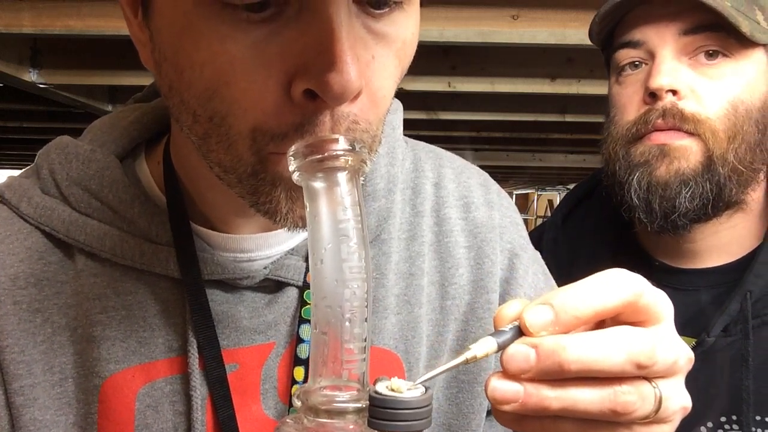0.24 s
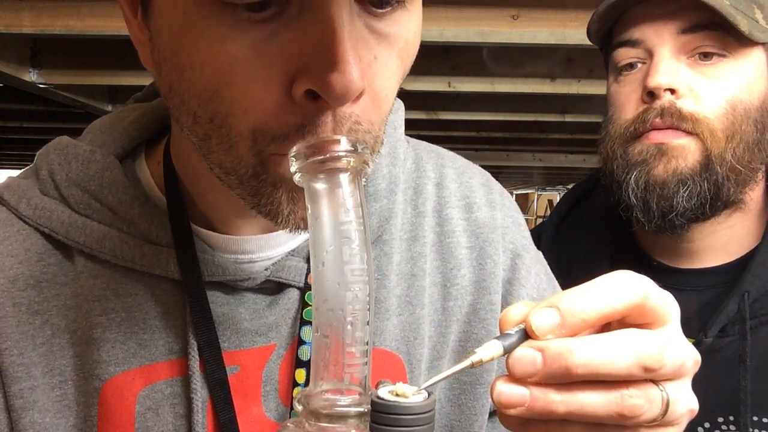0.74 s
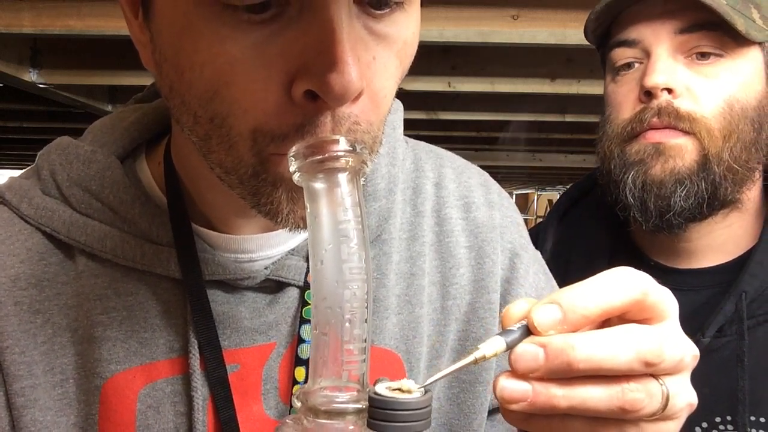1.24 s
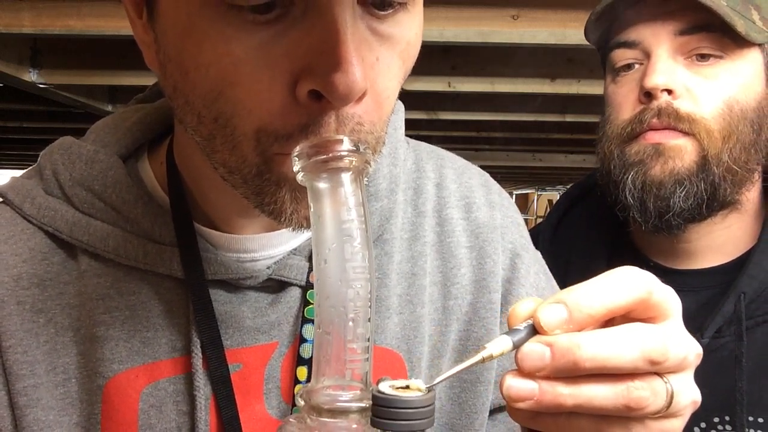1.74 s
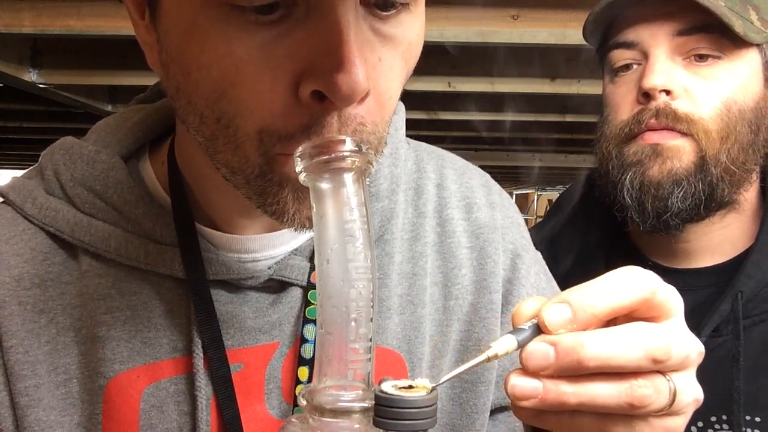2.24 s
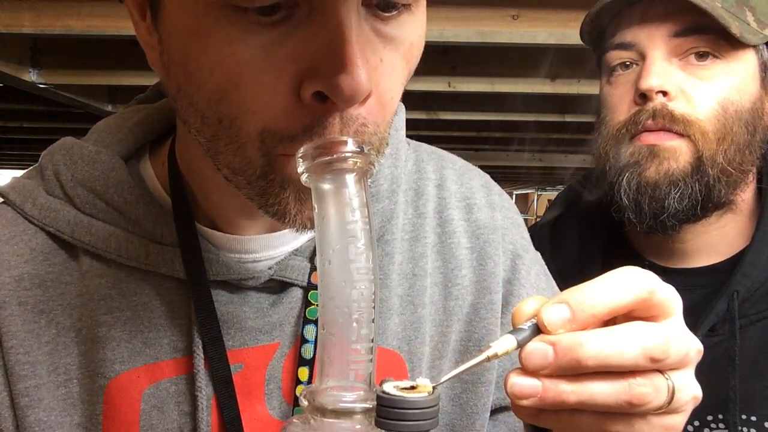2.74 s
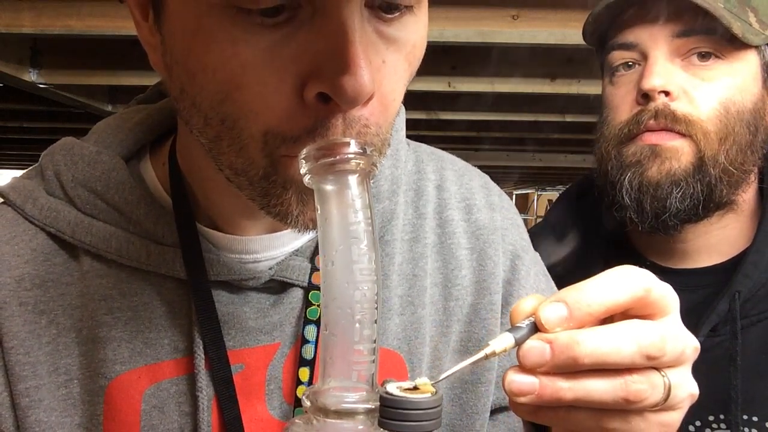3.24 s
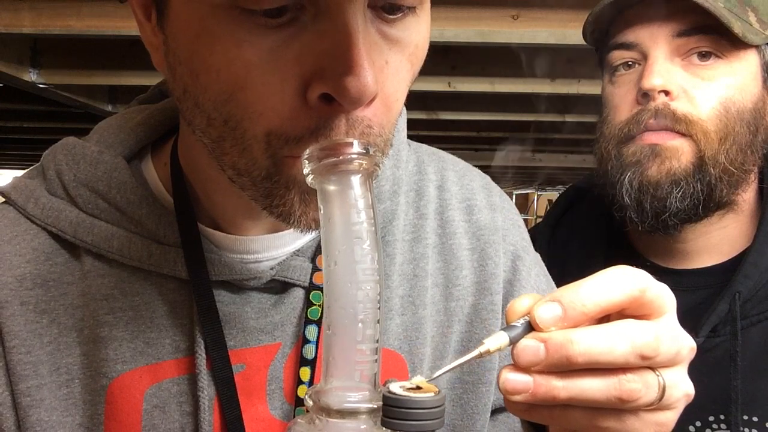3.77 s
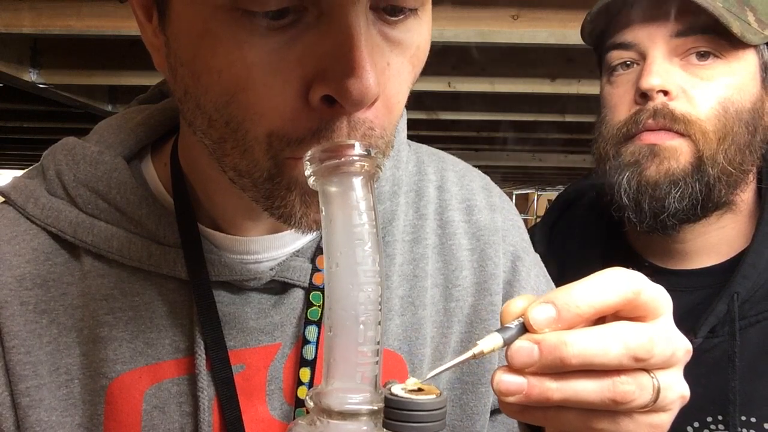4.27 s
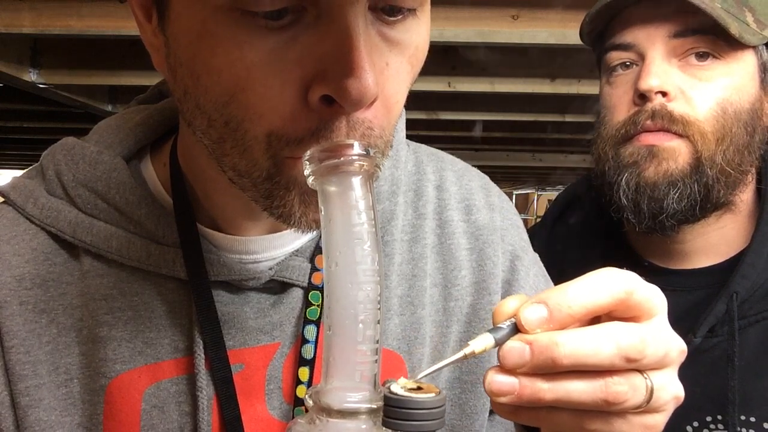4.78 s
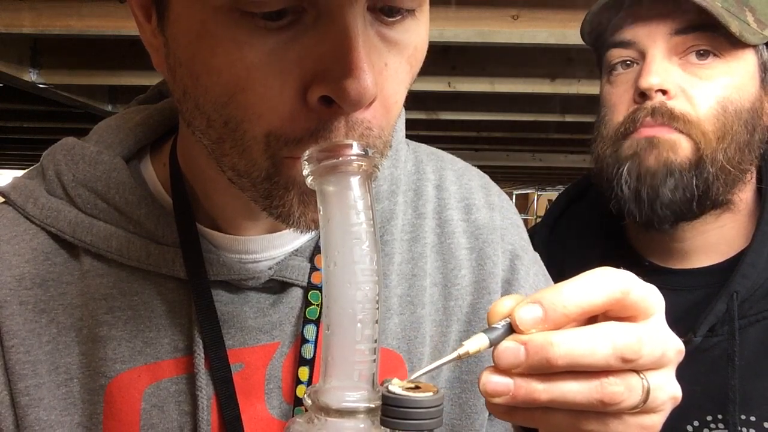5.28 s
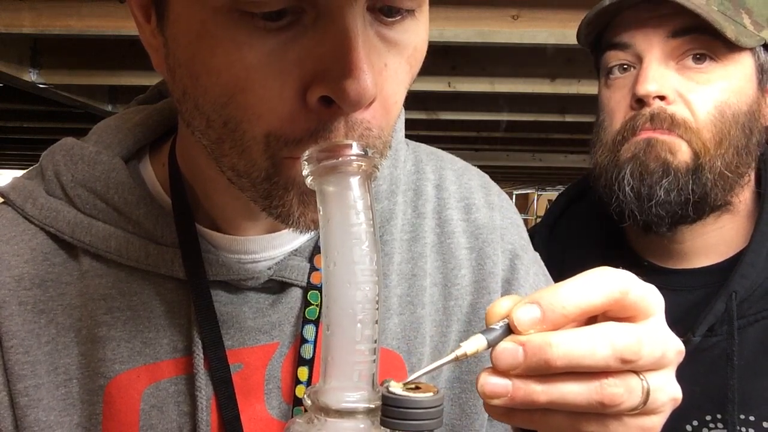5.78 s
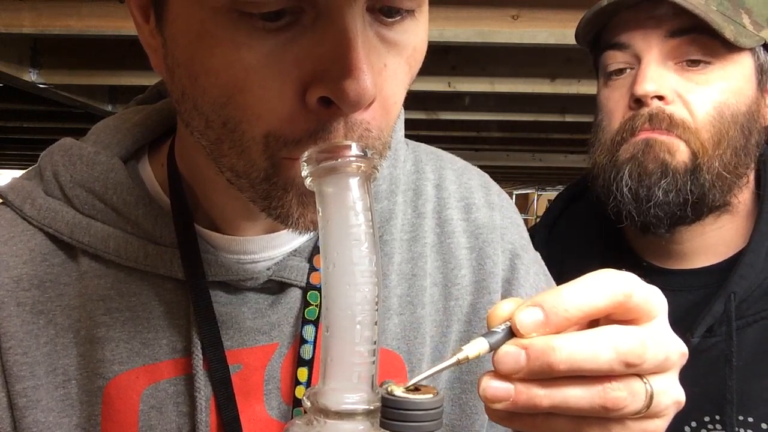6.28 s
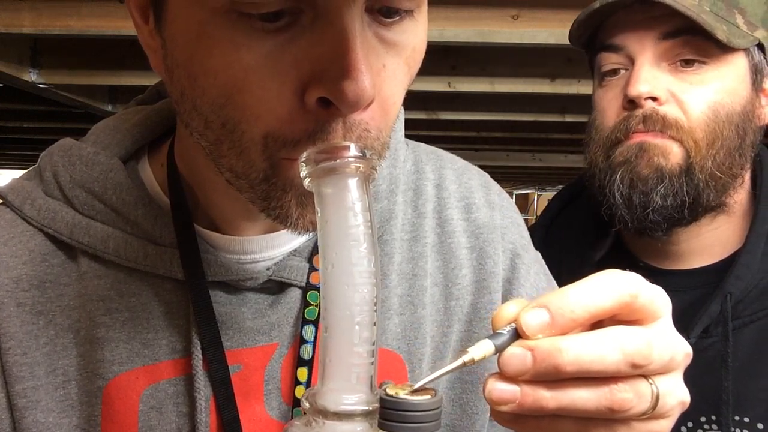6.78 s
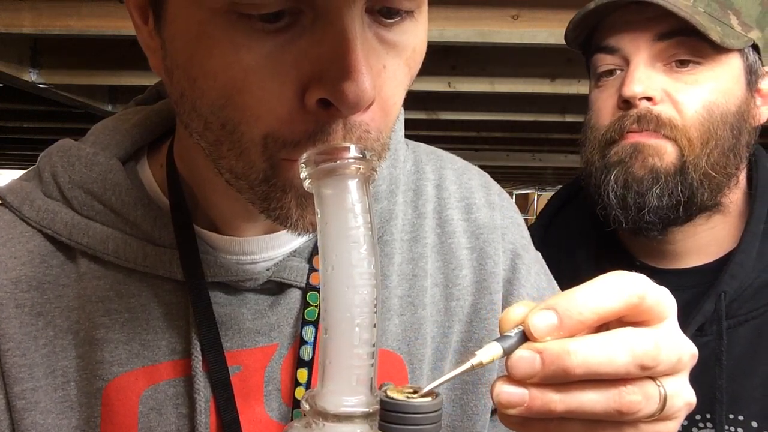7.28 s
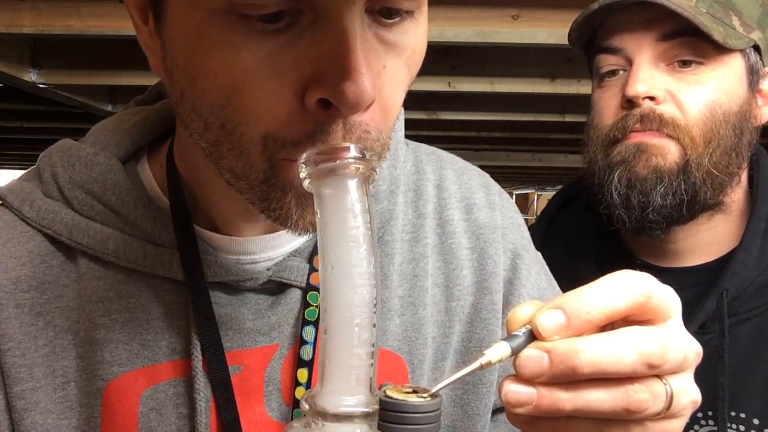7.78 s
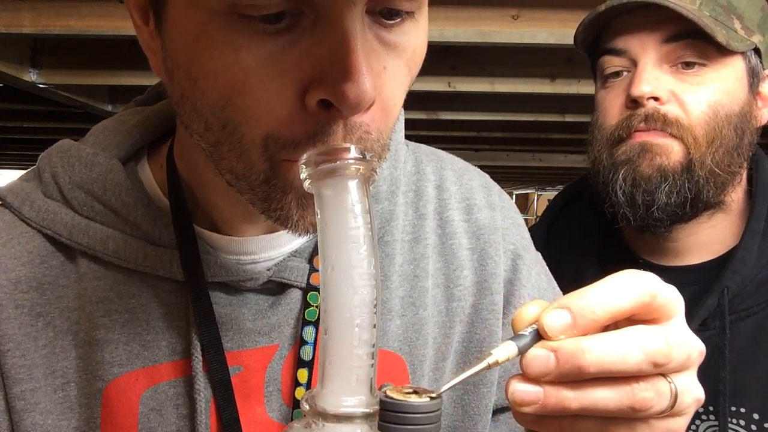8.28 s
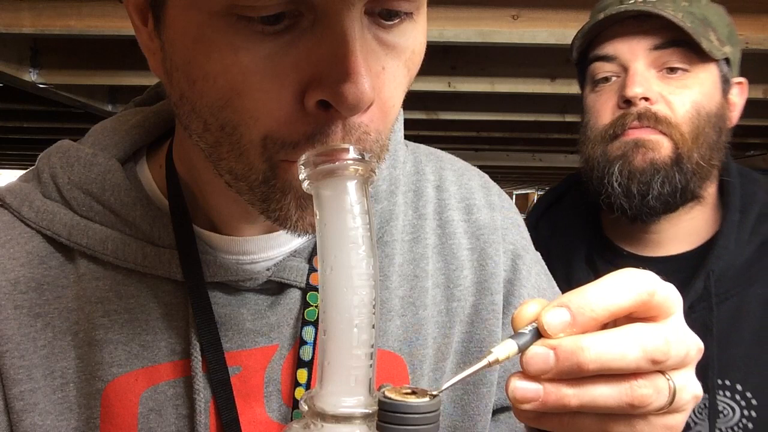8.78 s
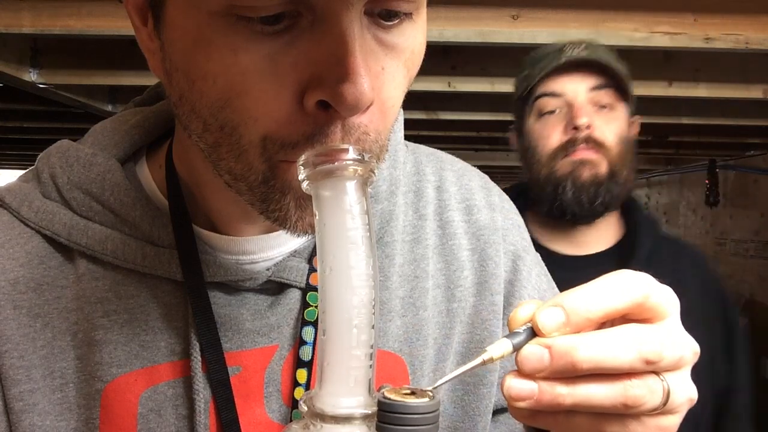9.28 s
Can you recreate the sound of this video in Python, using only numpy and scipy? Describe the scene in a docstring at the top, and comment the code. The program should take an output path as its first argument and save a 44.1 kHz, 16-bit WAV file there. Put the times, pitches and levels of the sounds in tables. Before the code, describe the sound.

From 0 to about 9.5 seconds, a glass water pipe bubbles without a break, close to the microphone in a dry indoor workshop. Many bubbles burst each second in uneven clusters: hollow low glugs, rounder middle-pitched plops and small high blips, each very short and slightly rising, over soft froth. A stronger burble stands out near 1.7 seconds, another near 7.1 and a hollow glug around 7.8. Tiny splashes and glassy ticks scatter throughout, with sharper pings near 3.9, 4.3 and especially 5.7. Hot oil sizzles faintly, strongest around 2.4, with thin crackly spits that grow rarer. A steady low motor hum, rumble and slight hiss continue beneath. From about 8.8 to 9.3 a jacket rustles, brightest near 9.1, with small cloth snaps and a deep soft swell; another brief rub follows at 9.46 as bubbling continues.

```python
"""Bubbling glass water pipe

Air drawn steadily through a water pipe in a workshop: bubbles burst as rising sines and ring the air
chambers (resonators), splashes ring higher, drops tick on the glass (decaying modes). Hot oil in the
bowl sizzles as shaped noise with spits. Near the end a jacket rustles, in noise bands, as someone turns.
Motors and mains hum as sines over a low noise rumble.
"""
import sys
import numpy as np
from scipy import signal
from scipy.fft import rfft, irfft
from scipy.io import wavfile
from scipy.ndimage import uniform_filter1d

SR = 44100
rng = np.random.default_rng(int(sys.argv[2]) if len(sys.argv) > 2 else 0)


def materialize(psi):
    """Save the field psi as 16-bit PCM at rate SR to the path in sys.argv[1].

    A 1-D psi becomes a single channel; in a 2-D psi each row is a channel.
    """
    bounded = np.clip(np.atleast_2d(psi).T, -1, 1)
    quanta = np.round(bounded * 32767).astype(np.int16)
    wavfile.write(sys.argv[1], SR, quanta)


N = 419832

# Loudest bubbles. Each row: time in seconds, nominal peak in dB, pitch in Hz, length scale in ms.
BUBBLES = [(0.013, -49, 800, 5.3), (0.03, -47.5, 700, 4.8), (0.058, -43, 780, 7.5), (0.089, -41, 311, 7.9),
           (0.136, -46.5, 774, 5.3), (0.147, -50.5, 720, 6.4), (0.232, -63, 1390, 3.64),
           (0.253, -45, 330, 2.8), (0.255, -48.5, 1455, 4.8), (0.258, -46, 816, 5.5),
           (0.274, -56, 2873, 4.5), (0.357, -44.5, 671, 11), (0.357, -51, 1290, 3.6), (0.367, -59, 1920, 7),
           (0.428, -47, 832, 3.8), (0.434, -45, 1490, 8.6), (0.446, -40, 750, 3.9), (0.522, -41, 755, 2.3),
           (0.482, -63, 2870, 4), (0.54, -52.5, 1910, 7.8), (0.564, -55, 1930, 7.7), (0.582, -44, 542, 7.5),
           (0.655, -42, 740, 3.5), (0.694, -46.5, 288, 10.8), (0.695, -41, 836, 4.6),
           (0.656, -63, 2920, 10), (0.693, -47, 1420, 5.7), (0.699, -50, 1940, 5.3),
           (0.717, -45.5, 318, 3.9), (0.742, -44, 686, 2.6), (0.752, -44.5, 310, 7),
           (0.816, -53.5, 1440, 5.8), (0.84, -50, 291, 11.4), (0.886, -58, 1905, 8),
           (0.921, -55, 1940, 9.6), (0.966, -53.5, 810, 5.5), (0.989, -48, 1410, 3.6),
           (1.014, -40.5, 740, 5.7), (1.029, -47.5, 1460, 10.5), (1.029, -57, 2835, 4.6),
           (1.063, -53.5, 2920, 7.3), (1.1, -46, 750, 11.6), (1.2, -60, 2870, 5.3),
           (1.202, -40.5, 790, 1.7), (1.184, -51.5, 1450, 7.1), (1.203, -52.5, 1940, 5.2),
           (1.263, -51.5, 1510, 5.6), (1.264, -47.5, 796, 3.8), (1.273, -49, 293, 11),
           (1.324, -52, 752, 5.3), (1.383, -48, 840, 4.4), (1.427, -42.5, 350, 5.9), (1.44, -41, 770, 2.3),
           (1.457, -57, 1980, 4), (1.556, -46.5, 870, 4.9), (1.591, -49.5, 1440, 5.6),
           (1.62, -67, 2960, 4.9), (1.675, -50, 1494, 5), (1.727, -50, 1535, 7.7), (1.589, -48, 375, 16),
           (1.655, -32.5, 787, 3.8), (1.701, -42, 857, 5.9), (1.733, -35, 653, 1.3), (1.8, -47, 645, 4.4),
           (1.801, -48.5, 1920, 6.6), (1.824, -48.5, 1860, 4.8), (1.844, -50, 1900, 8),
           (1.828, -43, 313, 8.5), (1.829, -40.5, 800, 3.4), (1.86, -37, 308, 3.1), (1.881, -44, 284, 16),
           (1.888, -48, 840, 5.4), (1.968, -51, 279, 10), (2.068, -42.5, 875, 4.7), (2.264, -46, 855, 5.5),
           (2.184, -60.5, 2800, 5), (2.254, -54.5, 1900, 4.3), (2.333, -48.5, 285, 11),
           (2.395, -45, 850, 4.2), (2.406, -57, 1920, 6.2), (2.391, -46, 302.4, 16.4),
           (2.44, -39, 350, 5.3), (2.441, -40, 760, 2.6), (2.495, -36.5, 740, 4.7), (2.503, -56, 1940, 4.7),
           (2.508, -58.5, 2870, 4.4), (2.52, -49.5, 1470, 5), (2.529, -52, 2750, 1.6),
           (2.531, -41, 760, 4.6), (2.635, -46, 748, 3), (2.642, -42.5, 287, 22), (2.684, -47.5, 306, 8.1),
           (2.686, -50, 1520, 7.5), (2.722, -53, 1940, 5.4), (2.726, -54, 1470, 5.4),
           (2.786, -56, 2500, 4.1), (2.745, -46, 280, 20), (2.745, -40.5, 737, 2.4),
           (2.913, -45.5, 650, 3.3), (3.0, -44.5, 1500, 3.1), (2.997, -50, 275, 7.2),
           (3.204, -53, 1930, 6.8), (3.225, -46.5, 350, 7.7), (3.232, -42.5, 767, 4),
           (3.368, -50.5, 317, 7.6), (3.379, -55, 1510, 6.1), (3.477, -60, 2900, 5.9),
           (3.52, -48.5, 1920, 9.6), (3.559, -49.5, 380, 8.4), (3.605, -44, 687, 2),
           (3.703, -42.5, 791, 3.2), (3.706, -41.5, 336, 6.5), (3.726, -45, 285.5, 14.6),
           (3.725, -43.5, 1470, 4.3), (3.726, -44, 730, 2.3), (3.727, -47, 1930, 5.3),
           (3.726, -58, 2960, 5.8), (3.835, -48, 1530, 4.5), (3.861, -41.5, 764, 2.57),
           (3.993, -53.5, 1870, 7.7), (4.013, -47.5, 1450, 7.3), (4.027, -46, 1380, 4.3),
           (4.033, -42, 760, 2.8), (4.073, -44, 269, 10.4), (4.116, -43.5, 830, 7.9),
           (4.22, -49.5, 1448, 5.7), (4.221, -51, 1940, 7), (4.238, -46, 273, 11.4), (4.238, -44, 768, 5.3),
           (4.282, -61, 2780, 5.7), (4.293, -49, 296, 4.4), (4.366, -48.5, 314, 12),
           (4.471, -56.5, 2800, 5), (4.505, -49, 1440, 3.4), (4.524, -48.5, 320, 19),
           (4.525, -40.5, 650, 2.5), (4.554, -46.5, 553, 6.2), (4.571, -42, 780, 6),
           (4.594, -62, 2920, 7.1), (4.711, -48.5, 1440, 5.9), (4.714, -43, 776, 3.9),
           (4.738, -49, 800, 2.6), (4.799, -44, 652, 4.2), (4.81, -61, 1935, 6.1), (4.978, -59, 1930, 6.6),
           (4.948, -52, 290, 9.7), (4.96, -65, 2900, 5.7), (4.995, -68, 2960, 5.5), (4.989, -48, 818, 7.6),
           (5.173, -41.5, 684, 2.2), (5.217, -41, 630, 3.2), (5.217, -49, 1530, 4.7), (5.184, -48, 287, 11),
           (5.291, -47.5, 1425, 5), (5.312, -45.5, 291, 18), (5.316, -41.5, 1450, 1.7),
           (5.317, -51, 1730, 12), (5.336, -56, 1940, 6.7), (5.367, -49.5, 846, 8.2),
           (5.397, -56.5, 2870, 4), (5.407, -52, 921, 5.2), (5.446, -51, 1900, 5.8),
           (5.53, -60.5, 2900, 6.3), (5.65, -42, 830, 4), (5.77, -48, 781, 4.6), (5.82, -52, 1526, 6.1),
           (5.887, -46, 800, 4.6), (5.839, -46.5, 1500, 5.2), (5.904, -47, 830, 7.5),
           (6.001, -54, 1940, 5.6), (6.017, -51.5, 355, 7.2), (6.128, -48, 875, 3.7),
           (6.142, -40, 930, 3.9), (6.164, -48, 290, 7.6), (6.221, -51, 805, 3.3), (6.315, -49, 277, 8.7),
           (6.355, -38.5, 290, 4.9), (6.487, -50, 678, 3.6), (6.506, -50, 1930, 7.3), (6.588, -47, 300, 14),
           (6.668, -38.5, 850, 3.9), (6.668, -46, 1480, 9.2), (6.699, -45, 296, 7), (6.702, -40, 714, 3.2),
           (6.752, -65.5, 2930, 7.5), (6.83, -48.5, 1470, 7.3), (6.819, -50, 825, 4.8),
           (6.892, -52.5, 1510, 5.2), (6.891, -55, 825, 2.9), (7.047, -49.5, 840, 3),
           (7.07, -39, 1580, 4.5), (7.07, -35.5, 760, 4), (7.072, -38, 1850, 3.5), (7.092, -46, 284, 4.6),
           (7.175, -53, 850, 3.4), (7.204, -49.5, 845, 7), (7.302, -46, 680, 2.5),
           (7.312, -45.5, 300, 18.3), (7.488, -49.5, 656, 5.5), (7.648, -46, 332, 5.5),
           (7.675, -54, 1940, 7.2), (7.784, -49.5, 1550, 7.1), (7.855, -51, 1820, 6.9),
           (7.83, -49.5, 1320, 4.8), (7.835, -36, 303, 9.9), (7.879, -42, 334, 3.9), (7.881, -44, 784, 14),
           (7.954, -47.5, 790, 4.2), (7.98, -60, 2830, 5.6), (8.03, -52.5, 830, 6.1), (8.084, -50, 845, 6),
           (8.16, -41.5, 586, 4.3), (8.175, -42.5, 350, 8.1), (8.244, -43, 300, 7.2),
           (8.239, -49, 824, 3.2), (8.348, -47.5, 1540, 3.6), (8.392, -54.5, 1940, 7.3),
           (8.453, -59, 2840, 4.7), (8.487, -48.5, 656, 5.8), (8.447, -47.5, 1505, 10.3),
           (8.461, -48, 830, 4.2), (8.501, -46, 280, 15.4), (8.575, -45.5, 1450, 2.4),
           (8.584, -44.5, 593, 2.4), (8.649, -44.5, 600, 4.2), (8.6495, -43, 1660, 1.7),
           (8.651, -41, 1916, 7.7), (8.65, -41, 1530, 7.6), (8.673, -47, 1510, 5.4),
           (8.666, -45, 289, 17.2), (8.927, -48.5, 1490, 2.5), (8.943, -46.5, 855, 6.4),
           (8.952, -44, 312, 7.8), (9.004, -48, 281, 20), (9.18, -54, 1860, 5.6), (9.223, -51, 1520, 4.6),
           (9.308, -40.5, 796, 4.3), (9.348, -41, 670, 3.3), (9.483, -40.5, 800, 4.1),
           (9.494, -45, 1400, 2.7), (9.511, -44, 330, 4.8)]
# Sizes of lesser bubbles dragged along by the loud ones.
# Each row: mean pitch in Hz, mean peak in dB, median length in ms, relative share.
FOLLOWERS = [(285, -52, 14, .22), (350, -56.5, 6, .06), (571, -53, 6, .15), (830, -54.5, 6, .2),
             (932, -53, 5, .14), (1470, -57, 5, .13), (1900, -61.5, 8.02, .1)]
# Air chambers of the pipe. Each row: resonance in Hz, width in Hz, mean level in dB.
CHAMBERS = [(283, 23.8, -2), (361.5, 75, -6.5), (549, 59, -8.5), (832, 120, -3.5), (1285, 68, -6.5),
            (1486, 112, -2), (1940, 44, 1)]
# Loudest splashes at the surface.
# Each row: start in seconds, ring strength in dB, centre in Hz, spatter re ring in dB.
SPLASHES = [(0.0333, -59, 2520, -8), (0.2744, -50, 2930, -4), (0.4818, -61, 2900, -6),
            (0.5252, -63, 3290, -7), (0.5821, -60, 2740, -6), (0.6554, -63, 2960, -9),
            (0.8644, -61, 2690, -6), (1.0296, -53, 2850, -8), (1.063, -48, 2920, -10),
            (1.1498, -57, 2920, -6), (1.197, -56, 2950, -6), (1.3688, -65, 2550, -6),
            (1.4556, -61, 2630, -6), (1.5499, -62, 3700, -9), (1.6192, -59, 2960, -8),
            (1.9345, -63, 2900, -6), (2.0817, -60, 2880, -8), (2.183, -54, 2790, -6),
            (2.356, -65, 3070, -6), (2.395, -59, 2900, -6), (2.5077, -58, 2880, -6), (2.528, -54, 2780, -6),
            (2.603, -57, 2930, -9), (2.7854, -58, 2480, -6), (2.814, -59, 2960, -7),
            (3.2036, -61, 2875, -6), (3.3558, -62, 2920, -6), (3.4765, -59, 2920, -6),
            (3.5553, -61, 2830, -6), (3.7249, -55, 2920, -5), (3.8711, -54, 3460, -6),
            (3.9165, -63, 2630, -6), (4.0826, -62, 2890, -7), (4.2373, -62, 2950, -8),
            (4.2822, -59, 2760, -6), (4.4687, -53, 2850, -7), (4.5351, -58, 2600, -6),
            (4.595, -56, 2910, -9), (4.7506, -60, 2950, -9), (4.8174, -59, 2950, -10),
            (4.8459, -56, 2880, -9), (4.9601, -58, 2950, -7), (4.9955, -56, 2930, -8),
            (5.0464, -63, 3220, -6), (5.1891, -64, 2630, -6), (5.227, -62, 2550, -6),
            (5.2909, -52.5, 2790, -16), (5.3353, -61, 2910, -6), (5.3966, -56, 2920, -7),
            (5.5293, -59, 2950, -12), (5.7024, -54.5, 3540, 0), (5.7745, -58, 2820, -6),
            (5.8865, -70, 2930, -6), (6.4931, -64, 2790, -8), (6.5615, -65, 2900, -8),
            (6.7526, -61, 2890, -9), (6.7905, -62, 2920, -6), (6.8309, -61, 2730, -8),
            (7.0459, -55, 2740, -8), (7.0693, -57, 2800, -6), (7.1107, -62, 2920, -7),
            (7.5926, -62, 2800, -8), (7.7398, -60, 2890, -8), (7.9808, -58, 2846, -6),
            (8.4532, -57, 2900, -7), (8.5195, -56.5, 2770, -9), (8.6163, -65, 2890, -6),
            (8.6687, -66, 2630, -6), (8.708, -55.5, 2720, -7), (8.7974, -63, 3660, -6)]
# Loudest drops on the glass.
# Each row: time in seconds, strength in dB, strongest mode in Hz, crack re strength in dB.
DROPS = [(0.0742, -64, 4700, -12.5), (0.0917, -60, 4670, -20), (0.2533, -62, 4780, -16),
         (0.273, -60.5, 4800, -10), (0.557, -69, 5980, -15), (0.5876, -63, 4650, -22),
         (0.7744, -59, 4610, -20), (0.814, -62, 5900, -21), (1.1507, -56.5, 3600, -19),
         (1.197, -61, 4650, -17), (1.25, -64, 5800, -23.5), (1.4097, -62, 4560, -16),
         (1.5475, -61, 3710, -15), (1.569, -59, 4940, -13), (1.85, -68, 4700, -18),
         (2.1086, -61, 4770, -21.5), (2.169, -53, 3900, -23), (2.1844, -61, 4700, -7),
         (2.288, -65, 5980, -23.5), (2.563, -57, 4760, -16), (2.7362, -65, 4770, -25),
         (2.7564, -55, 4680, -24), (2.822, -63, 4640, -20), (2.9744, -63, 4740, -23.5),
         (3.21, -63, 4680, -26), (3.23, -68, 5980, -8), (3.264, -56.5, 7070, -13), (3.2632, -64, 7780, -20),
         (3.338, -73, 4680, -22), (3.703, -49.5, 4685, -26), (3.7918, -62, 4695, -24),
         (3.8716, -48, 3500, -25), (3.91, -62, 4650, -18), (4.0635, -64, 4700, -21),
         (4.283, -59, 7070, -30), (4.3376, -51.5, 7780, -9.5), (4.338, -54, 7070, -24),
         (4.5368, -55.5, 4940, -17), (4.9902, -61, 4680, -19), (5.1313, -63, 4700, -22),
         (5.257, -62, 4640, -22), (5.384, -63, 4890, -7), (5.4355, -65.5, 4640, -20.5),
         (5.7031, -41.5, 7400, -12), (6.0205, -59, 4720, -17), (6.039, -64, 4700, -22.5),
         (6.5796, -65, 4650, -22), (6.6686, -57.5, 4700, -27), (6.7461, -59, 4840, -15),
         (6.794, -63, 4730, -15), (7.222, -70, 7070, -20), (7.7957, -68, 4630, -22),
         (7.9613, -64.5, 4670, -14), (8.043, -69, 5980, -6), (9.372, -57, 4610, -14)]
# Glass modes. Each row: pitch in Hz, relative level in dB, t60 in seconds.
GLASS_MODES = [(2790, 4, 0.025), (2870, 7.5, 0.062), (3600, 1.5, 0.03), (4610, -2, 0.025), (4685, 5, 0.041),
               (4770, 0.5, 0.024), (5000, -8, 0.011), (5980, 1, 0.034), (7070, -2.5, 0.044),
               (7780, -12, 0.03), (8900, -11, 0.02), (9800, -11, 0.034), (12300, -3, 0.035)]
# Hot oil in the bowl. Each row: time in seconds, mean sizzle level in dB.
HEAT = [(0, -87), (1.6, -84), (2.4, -80.5), (3.3, -83.5), (4.4, -83.5), (5.5, -84), (6.5, -82.5),
        (8.3, -89.5), (9.52, -86)]
# Loudest spits of oil. Each row: start in seconds, strength in dB, centre in Hz, width as share of centre.
SPITS = [(0.052, -63, 9700, 0.057), (0.0787, -61, 11800, .12), (0.2733, -66, 12300, .03),
         (0.352, -62, 13400, .15), (0.4429, -64, 12300, .03), (0.4968, -55, 12300, 0.21),
         (0.6499, -55, 9400, 0.16), (0.6983, -62, 12000, .2), (0.7513, -59, 9870, .03),
         (0.814, -72, 12300, .03), (1.3957, -55.5, 12530, 0.52), (1.482, -65, 12300, .05),
         (1.548, -63, 10500, 0.16), (1.5738, -59, 12300, .03), (1.6636, -62, 9700, .06),
         (1.9819, -62, 8800, .15), (2.4094, -57, 12700, .15), (2.442, -61, 9400, .1),
         (2.5102, -62.5, 12300, .03), (2.5296, -56, 12300, .05), (2.6289, -53, 12300, .3),
         (2.7227, -62.5, 12700, .25), (2.9382, -60.5, 13900, .15), (3.23, -68, 12300, .03),
         (3.364, -66, 10000, 0.23), (3.413, -64, 12600, .3), (3.562, -65, 12500, .4),
         (3.7055, -58, 11000, 0.4), (4.0923, -59, 12240, .1), (4.152, -64, 10500, .2),
         (4.3365, -58, 13500, 0.18), (4.3857, -65, 14100, .15), (5.021, -63, 13100, 0.21),
         (5.3512, -59, 14200, 0.16), (5.397, -64.5, 12300, .05), (5.883, -64.5, 14000, .15),
         (6.346, -65.5, 9610, 0.044), (6.5987, -65.5, 10100, 0.057), (6.791, -65, 13140, 0.207),
         (7.9234, -64, 12300, .03)]
# Kinds of lesser spit. Each row: centre in Hz, width as share of centre.
SPIT_KINDS = [(9900, 0.046), (11000, .3), (12300, .025), (12300, .025), (13000, .25)]
# Jacket rubbing. Each row: time in seconds, rub level in dB, brightness (above 8 kHz) in dB re rub.
RUSTLE = [(8.72, -76, -5), (8.846, -66.5, 2), (8.896, -70, -7), (8.965, -65, 3), (8.996, -59.5, -2),
          (9.02, -59, -2), (9.06, -62, -4), (9.075, -56, 6), (9.12, -58, 3), (9.17, -61.5, 1.5),
          (9.23, -64, 2), (9.28, -67, 0), (9.36, -78.5, -1), (9.44, -76, 1), (9.46, -61.5, -13),
          (9.52, -60.5, -7)]
# Cloth snaps. Each row: time in seconds, strength in dB, brightness in dB re strength.
CREASES = [(8.996, -42, -12), (9.003, -44, -14), (9.072, -52, 4), (9.104, -50, -3), (9.222, -57, 0.5),
           (9.4545, -54, -6), (9.4625, -52, -8)]
# Motor and mains tones. Each row: pitch in Hz, mean rms in dB.
HUM_TONES = [(47.81, -63.2), (53.3, -66.4), (59.96, -73.4), (79.96, -60.5), (95.62, -60.8), (119.88, -66.3),
             (143.41, -55.6), (167.69, -63.2), (177.07, -68.5), (191.21, -62.1), (359.67, -73.7),
             (479.54, -78.3), (2159, -90), (3478, -94)]
# One wandering tone: centre in Hz, width of each resonator in Hz, rms in dB.
WANDERING_TONE = (173.5, 5.6, -65.5)

# Noise spectra. Each row: frequency in Hz, relative density in dB per Hz.
SIZZLE_SPECTRUM = [(4000, -25), (7000, -6), (9500, 0), (12500, -2), (14000, -4.5), (15500, -8)]
CLOTH_SPECTRUM = [(1290, -14), (2200, -5.5), (2600, -3), (3710, -4), (4760, -7.5), (7760, -11.5),
                  (8410, -15), (12400, -21), (15000, -26)]
HISS_SPECTRUM = [(500, 7.5), (2200, -1), (3500, -7), (5500, -14), (7800, -18), (9000, -30), (15500, -49)]
RUMBLE_SPECTRUM = [(20, -5.5), (50, 7.5), (90, 13), (125, 9), (200, 12), (240, 1.5), (500, -12),
                   (2200, -51)]
CHURN_SPECTRUM = [(200, 2.5), (2000, -2.5), (4000, -24)]
FOAM_SPECTRUM = [(200, -2.0), (900, 2.5), (2300, -6), (4000, -23)]
CRACK_SPECTRUM = [(1500, -36), (4000, 44), (8000, 38), (15000, 21)]
DEEP_SPECTRUM = [(25, -9), (45, 2.5), (52, 11), (66, 7), (80, 13.5), (88, 12.5), (97, 12),
                 (110, 5.5), (125, 2.5), (170, -40.0)]

GLIDE_SHARE = 0.035  # rise in pitch over one bubble length
FOLLOW_MEAN_LAG_S, FOLLOW_SPREAD_DB, FOLLOW_DETUNE_SHARE = 0.03, 1, 0.045
SLOSH_DELAY_S, SLOSH_HZ = 0.00015, 5.6  # rms of the wavering delay, its corner rate
CHAMBER_SWAY_DB, CHAMBER_SWAY_HZ = 1.74, 15.4
CHURN_DB, FOAM_DB, FROTH_DB = -7, -13.5, -57.5
SPLASH_WIDTH_HZ, SPLASH_DECAY_S, SPLASH_T60_S = 830, 0.0063, 0.039
DROPS_PER_S, DROP_DB, DROP_HZ, DROP_CRACK_DB = 17, -75.5, 4700, -16  # lesser drops; rate follows the gush
TOUCH_T60_S, PATTER_DECAY_S = 0.0055, 0.005  # soft uptake by the glass; break-up of a drop
LESSER_SPITS, SPITS_THIN_S, SPIT_DB = 52, 6.1, -72  # count, time constant, mean strength
HISS_DB, RUMBLE_DB, DEEP_DB = -63.5, -59, -59.5
SWELL_S, SWELL_DB, SWELL_WIDTH_S = 9.15, 6.5, 0.17  # deepest rumble swells as someone turns
CUTOFF_HZ = 15300


def from_db(db):
    """Gain of a level."""
    return 10 ** (np.asarray(db) / 20)


def rms_one(x):
    """Scale to rms 1."""
    return x / np.sqrt(np.mean(x ** 2) + 1e-20)


def white():
    """White noise."""
    return rng.standard_normal(N)


def in_time(rows):
    """Interpolate every column of a curve table to samples."""
    s, *columns = np.transpose(rows)
    return [np.interp(np.arange(N) / SR, s, c) for c in columns]


def coloured(x, spectrum):
    """Shape to a spectrum, log-interpolated in frequency; rms 1."""
    hz, level_db = np.transpose(spectrum)
    bins_hz = np.maximum(np.arange(N // 2 + 1) * SR / N, 1)
    gain = from_db(np.interp(np.log(bins_hz), np.log(hz), level_db))
    return rms_one(irfft(rfft(x) * gain, N))


def drift(rate_hz):
    """Slow random curve of rms about 1: two-pole low-passed noise at SR/40, interpolated."""
    r = np.exp(-80 * np.pi * rate_hz / SR)
    noise = rng.standard_normal(N // 40 + 2002)
    slow = signal.lfilter([1], [1, -2 * r, r * r], noise)[2000:]  # drop the settling
    return np.interp(np.arange(N) / 40, np.arange(len(slow)), rms_one(slow))


def resonance(x, hz, width_hz):
    """Two-pole peak of about gain 1."""
    r = np.exp(-np.pi * width_hz / SR)
    poles = [1, -2 * r * np.cos(2 * np.pi * hz / SR), r * r]
    return signal.lfilter([(1 - r * r) / 2, 0, (r * r - 1) / 2], poles, x)


def noise_band(noise, hz, width_hz):
    """Noise through two equal resonances; rms 1."""
    return rms_one(resonance(resonance(noise, hz, width_hz), hz, width_hz))


def ring(clicks, hz, t60_s):
    """Each unit click starts a decaying sine of initial height 1."""
    r, w = np.exp(-np.log(1000) / (t60_s * SR)), 2 * np.pi * hz / SR
    return signal.lfilter([0, np.sin(w)], [1, -2 * r * np.cos(w), r * r], clicks + 1e-18)


def grains(per_s, spread_db):
    """Random clicks of either sign, many small and a few large."""
    sizes = from_db(spread_db * np.minimum(rng.exponential(1, N), 4)) * rng.choice([-1, 1], N)
    return sizes * (rng.random(N) < per_s / SR)


def loud_bubbles(rows, glide_share, lead):
    """Each bubble swells fast, rings a few cycles and rises in pitch as it nears the surface."""
    out = np.zeros(N + SR)
    for (s, db, hz, ms), sign in zip(rows, rng.choice([-1, 1], len(rows))):
        length_s = ms / 1000
        t = np.arange(int(5 * length_s * SR)) / SR
        swell = 2.04 * t / length_s
        shape = (swell * np.exp(1 - swell)) ** 1.73
        phase = 2 * np.pi * hz * (t + glide_share * (t * t / length_s / 2 - 0.97 * t))
        at = max(int((s - lead * length_s) * SR), 0)
        out[at:at + len(t)] += sign * from_db(db) * shape * np.sin(phase)
    return out[:N]


def followers():
    """Rows of lesser bubbles, one at a random lag after each loud one."""
    hz, db, ms, share = np.transpose(FOLLOWERS)
    share = np.cumsum(share)
    pick, luck = rng.random((len(BUBBLES), 2)), rng.standard_normal((len(BUBBLES), 3))
    size = np.searchsorted(share / share[-1], pick[:, 0])
    s = np.array(BUBBLES)[:, 0] - FOLLOW_MEAN_LAG_S * np.log(1 - pick[:, 1])
    peak_db = db[size] + FOLLOW_SPREAD_DB * luck[:, 1]
    pitch_hz = hz[size] * (1 + FOLLOW_DETUNE_SHARE * luck[:, 2])
    length_ms = ms[size] * np.exp(0.4 * luck[:, 0])
    return list(zip(np.clip(s, 0, N / SR), peak_db, pitch_hz, length_ms))


def chambers(x):
    """Parallel air resonances; moving water sways their levels and bends their pitch by a wavering delay."""
    n, out = np.arange(N), 0
    for k, (hz, width_hz, db) in enumerate(CHAMBERS):
        gain = from_db(db + CHAMBER_SWAY_DB * drift(CHAMBER_SWAY_HZ))
        read_at = n + SLOSH_DELAY_S * SR * drift(SLOSH_HZ)
        bent = np.interp(read_at, n, resonance(x + 1e-18, hz, width_hz))
        out = out + (-1) ** k * gain * bent  # alternate polarity
    return out


def small_bubbles(gush):
    """Froth of soft rings and foam noise, coming in gushes, heard through the chambers; rms 1."""
    clicks = grains(800 * from_db(3.2 * gush), spread_db=2.0)
    pitches_hz, dealt = np.geomspace(250, 2300, 24), rng.integers(0, 24, N)
    rings = 0
    for k, hz in enumerate(pitches_hz):
        onset = ring(clicks * (dealt == k), hz, 2.66 / hz)  # a short first ring makes the bubble swell
        rings = rings + ring(onset, hz, 10.8 / hz) * (hz / 800) ** 1.046
    rings = rms_one(rings)
    foam = from_db(FOAM_DB + 1.9 * gush) * coloured(white(), FOAM_SPECTRUM)
    return rms_one(chambers(rings + foam) + from_db(-26.0) * rings)


def small_splashes(gush):
    """Tiny surface bubbles: sparse short rings at high pitches; rms 1."""
    clicks = grains(60 * from_db(4.9 * gush), spread_db=5.5)
    pitches_hz, dealt = np.geomspace(2300, 4300, 12), rng.integers(0, 12, N)
    rings = 0
    for k, hz in enumerate(pitches_hz):
        onset = ring(clicks * (dealt == k), hz, 3.5 / hz)
        rings = rings + ring(onset, hz, 130.0 / hz)
    return rms_one(rings)


def loud_splashes():
    """A small high ring inside a broad burst of spatter that dies fast."""
    out, t = np.zeros(N), np.arange(int(0.06 * SR)) / SR
    noises = rng.standard_normal((len(SPLASHES), len(t)))
    for (s, db, hz, spatter_db), noise in zip(SPLASHES, noises):
        burst = noise_band(noise, hz, SPLASH_WIDTH_HZ) * np.exp(-t / SPLASH_DECAY_S)
        envelope = np.exp(-np.log(1000) * t / SPLASH_T60_S) * (1 - np.exp(-t / 0.004))
        tone = np.sin(2 * np.pi * hz * t) * envelope
        at = int(s * SR)
        out[at:at + len(t)] += from_db(db) * (tone + from_db(spatter_db) * burst)
    return out


def lesser_drops(gush):
    """Rows of random drops, mostly in the gushes, around the same spot of the glass."""
    at = np.flatnonzero(rng.random(N) < DROPS_PER_S * from_db(4 * gush) / SR)
    luck = rng.standard_normal((len(at), 3))
    return [(i / SR, DROP_DB + 1.7 * a, DROP_HZ * np.exp(0.043 * c), DROP_CRACK_DB + 4 * b)
            for i, (a, b, c) in zip(at, luck)]


def glass(gush, heat_db):
    """Drops ring mostly the mode of the spot they hit and crack; fine spray, following the heat, rings all."""
    s, db, spot_hz, crack_db = np.transpose(DROPS + lesser_drops(gush))
    at, out = np.round(s * SR).astype(int), np.zeros(N)
    luck_db = rng.normal(0, 1, (len(at), len(GLASS_MODES)))
    spray = grains(400 * from_db(3.1 * gush), spread_db=3.0)
    dealt = rng.integers(0, len(GLASS_MODES), N)
    t = np.arange(int(4 * PATTER_DECAY_S * SR)) / SR
    for k, (hz, mode_db, t60_s) in enumerate(GLASS_MODES):
        clicks = from_db(mode_db + heat_db + 0.5) * spray * (dealt == k)
        # loss grows with distance in octaves from the spot, up to a floor set by the mode
        away_db = np.minimum(90 * np.abs(np.log2(hz / spot_hz)), 21.5 - mode_db - luck_db[:, k])
        for i, gain in zip(at, from_db(db - away_db)):
            touched = rng.random(len(t)) < 900 / SR
            touches = touched * rng.normal(0, 0.4, len(t)) * np.exp(-t / PATTER_DECAY_S)
            clicks[i:i + len(t)] += gain * (touches + 0.52 * (t == 0))[:N - i]
        soft = ring(clicks, hz, TOUCH_T60_S)
        out += ring(soft, hz, t60_s) * 2 * np.log(1000) / (TOUCH_T60_S * SR)
    cracks = np.zeros(N)
    cracks[at] = from_db(db + crack_db)
    cracks = uniform_filter1d(cracks + 1e-18, size=70) * 2.16
    burst = signal.lfilter([1], [1, -np.exp(-1 / (0.0032 * SR))], cracks)
    return out + burst * coloured(white(), CRACK_SPECTRUM)


def lesser_spits():
    """Rows of random spits, rarer as the oil is spent."""
    spent = 1 - np.exp(-N / SR / SPITS_THIN_S)
    rows = []
    for a, b, c in rng.random((LESSER_SPITS, 3)):
        s = -SPITS_THIN_S * np.log(1 - spent * a) * 0.99
        rows.append((s, SPIT_DB + 8 * (b - 0.5), *SPIT_KINDS[int(c * len(SPIT_KINDS))]))
    return rows


def sizzle(heat_db):
    """Hot oil: a patchy fizz of tiny bursts, and single spits as short puffs of band noise."""
    fizz = rms_one(grains(500 * from_db(4.6 * drift(25)), spread_db=13.0))
    out = from_db(heat_db + 0.33 * drift(25)) * coloured(0.33 * fizz + white(), SIZZLE_SPECTRUM)
    t, spits = np.arange(int(0.039 * SR)) / SR, SPITS + lesser_spits()
    for (s, db, hz, share), noise in zip(spits, rng.standard_normal((len(spits), len(t)))):
        width_hz = share * hz
        decay = np.exp(-t / (0.0016 + 1.5 / width_hz))  # narrow puffs last longer
        puff = noise_band(noise, hz, width_hz) * decay * (1 - np.exp(-t / 0.00085))
        at = int(s * SR)
        out[at:at + len(t)] += from_db(db) * puff / 2
    return out


def jacket():
    """Cloth rubbing: noise with clumped grains in bands, brighter or duller as it slides; creases snap."""
    silence = [(0, -120, 0), (RUSTLE[0][0] - 0.05, -120, 0)]
    level_db, bright_db = in_time(silence + list(RUSTLE))
    snaps = np.zeros((2, N))  # below and above 8 kHz
    for s, db, top_db in CREASES:
        snaps[:, int(s * SR)] = from_db([db, db + top_db])
    snaps = signal.lfilter([0.3], [1, -np.exp(-1 / (0.0036 * SR))], snaps + 1e-18)
    clumps = rms_one(grains(900 * from_db(2.7 * drift(30)), spread_db=3.0))
    rub = coloured(clumps + 1.36 * white(), CLOTH_SPECTRUM)
    above = [signal.sosfiltfilt(signal.butter(3, hz, "high", fs=SR, output="sos"), rub)
             for hz in (3200, 5000, 8000)]
    low = sum(from_db(1.8 * drift(18)) * (a - b) for a, b in zip([rub] + above, above))
    low_gain = from_db(level_db) + snaps[0]
    top_gain = from_db(level_db + bright_db + 1.1 * drift(20)) + snaps[1]
    return low_gain * low + top_gain * above[-1]


def hiss(gush):
    """Air through the froth: even noise that flutters slightly."""
    return from_db(HISS_DB + 0.12 * gush + 1.28 * drift(27)) * coloured(white(), HISS_SPECTRUM)


def hum():
    """Motors and mains: sines of slightly drifting level, a narrow-noise tone and low rumbles."""
    t = np.arange(N) / SR
    tones = 0
    for hz, db in HUM_TONES:
        sine = np.sin(2 * np.pi * (hz * t + rng.random()))
        tones = tones + np.sqrt(2) * from_db(db + 0.72 * drift(1.7)) * sine
    hz, width_hz, db = WANDERING_TONE
    wander = from_db(db) * noise_band(white(), hz, width_hz)
    deep_db = DEEP_DB + SWELL_DB * np.exp(-((t - SWELL_S) / SWELL_WIDTH_S) ** 2)
    deep = from_db(deep_db + 2.5 * drift(5.0)) * coloured(white(), DEEP_SPECTRUM)
    rumble = from_db(RUMBLE_DB + 1.2 * drift(4.2)) * coloured(white(), RUMBLE_SPECTRUM)
    return tones + wander + deep + rumble


def room(x, t60_s):
    """Diffuse tail: convolution with dull decaying noise of unit energy."""
    t = np.arange(int(0.4 * SR)) / SR
    dull = signal.lfilter([1], [1, -0.5], rng.standard_normal(len(t)))
    tail = dull * np.exp(-np.log(1000) * t / t60_s) * (t > 0.004)
    return signal.fftconvolve(x, tail / np.sqrt(np.sum(tail ** 2)))[:N]


def scene():
    """Pipe, oil and jacket in the room, over hiss and hum."""
    heat_db, = in_time(HEAT)
    loud = loud_bubbles(BUBBLES + followers(), GLIDE_SHARE, lead=0.1913)
    loud = loud * from_db(0.8 * drift(90))  # big bubbles wobble and break up
    stir = np.log(uniform_filter1d(loud ** 2, int(0.06 * SR)) + from_db(-115))
    gush = 0.6 * rms_one(stir - stir.mean()) + 0.7 * drift(9)  # froth comes with the big bubbles
    loud_envelope = np.sqrt(np.abs(uniform_filter1d(loud ** 2, size=200)))
    churn = loud_envelope * coloured(white(), CHURN_SPECTRUM)
    pipe = loud + chambers(from_db(-15.0) * loud + from_db(CHURN_DB) * churn)
    pipe = pipe + from_db(FROTH_DB) * small_bubbles(gush)
    water = pipe + from_db(-86.0) * small_splashes(gush) + loud_splashes()
    near = water + glass(gush, heat_db) + sizzle(heat_db) + jacket()
    return (near + from_db(-14) * room(near, t60_s=0.075) + hiss(gush) + hum())[None]


def record(dry):
    """Steep elliptic low-pass cuts the top."""
    return signal.sosfilt(signal.ellip(12, 0.3, 60, CUTOFF_HZ, fs=SR, output="sos"), dry)


dry = scene()
out = record(dry)
materialize(out)
```